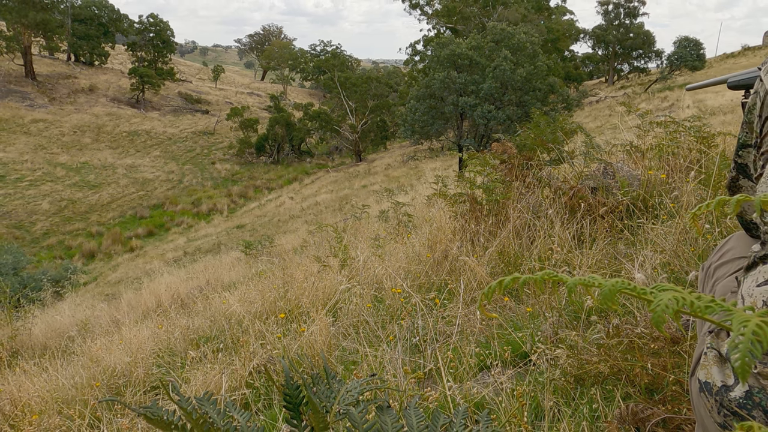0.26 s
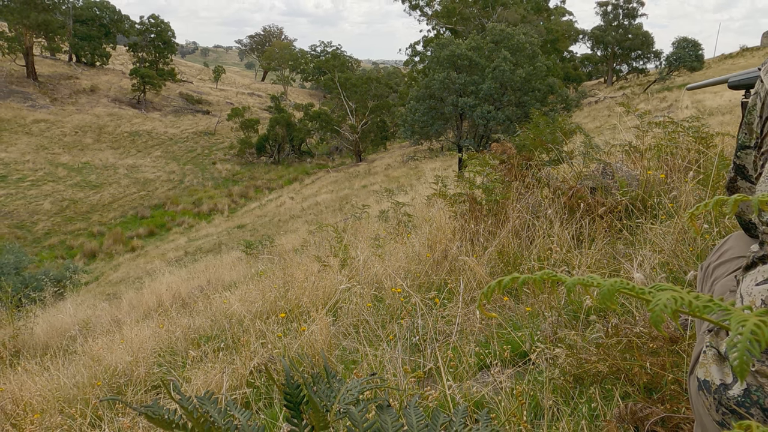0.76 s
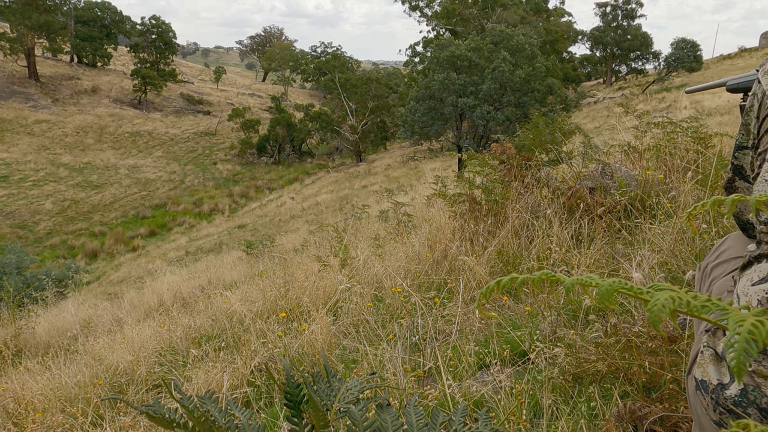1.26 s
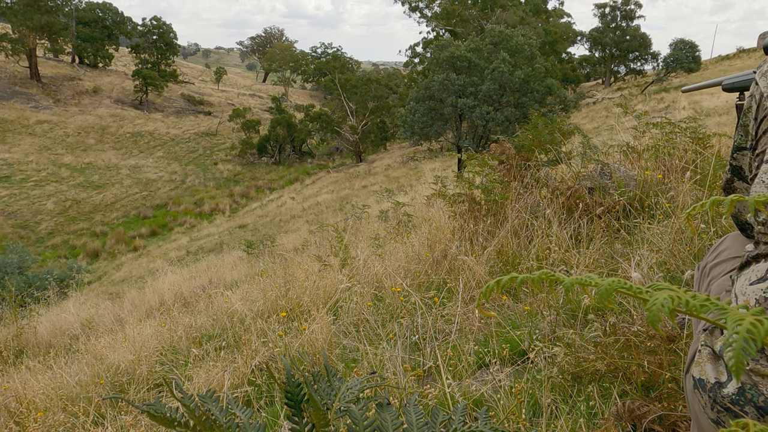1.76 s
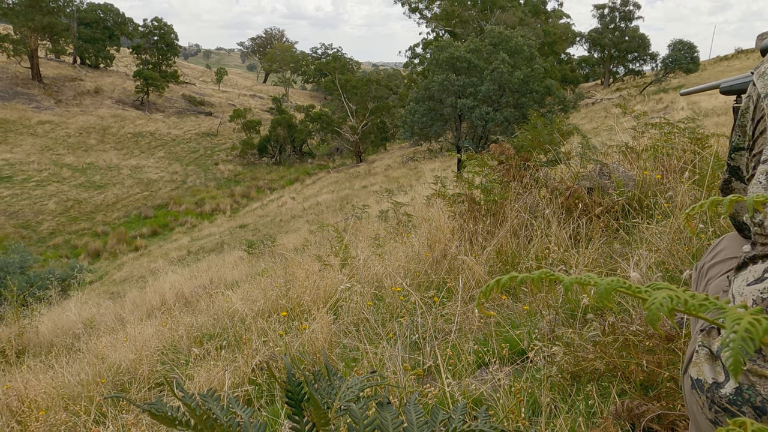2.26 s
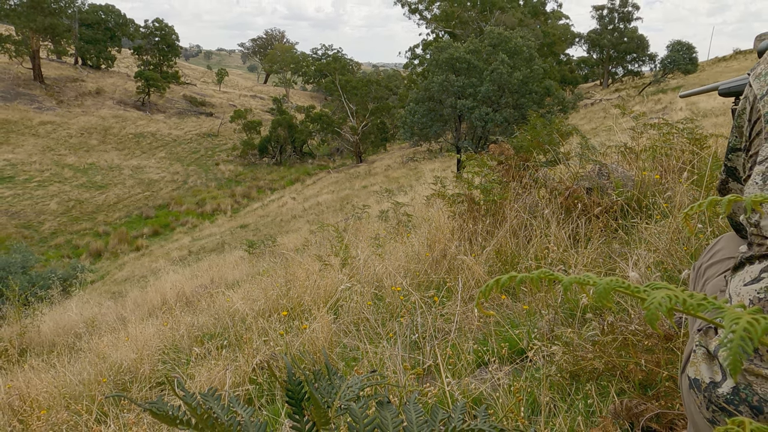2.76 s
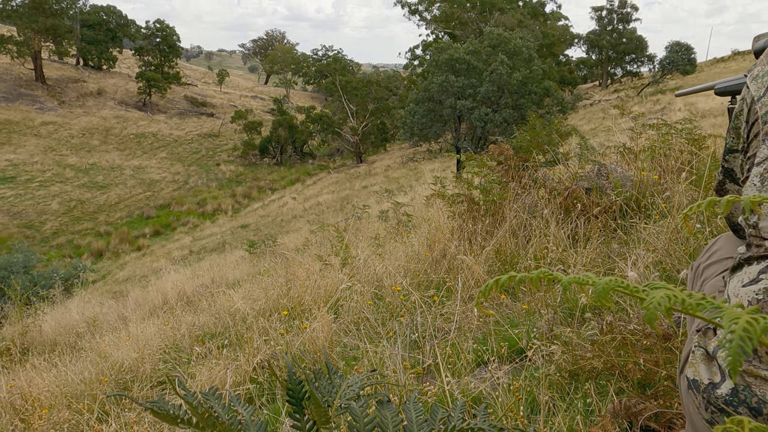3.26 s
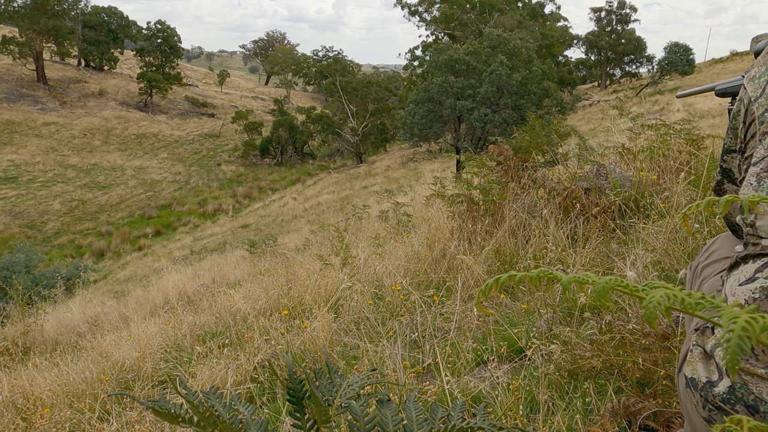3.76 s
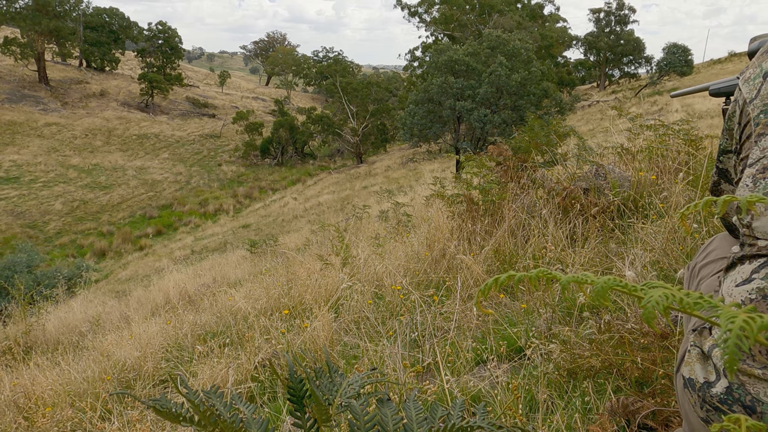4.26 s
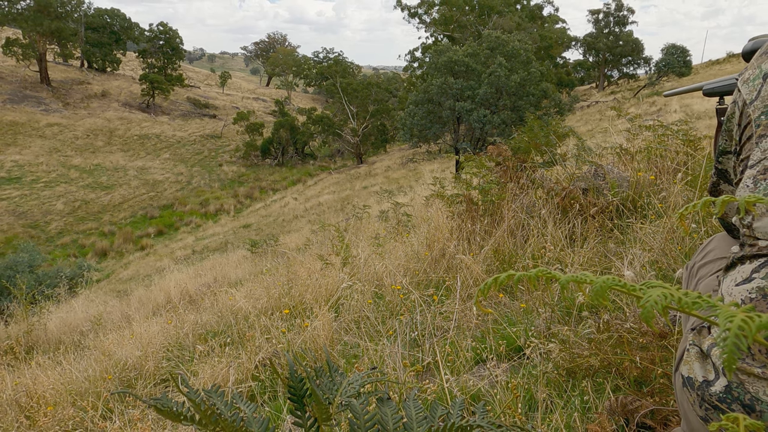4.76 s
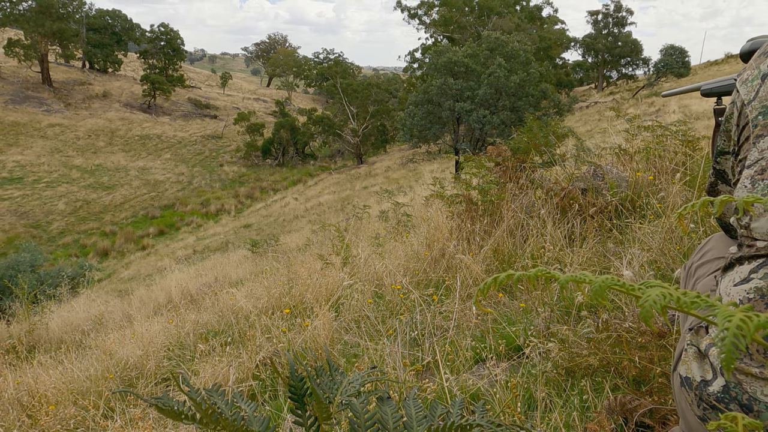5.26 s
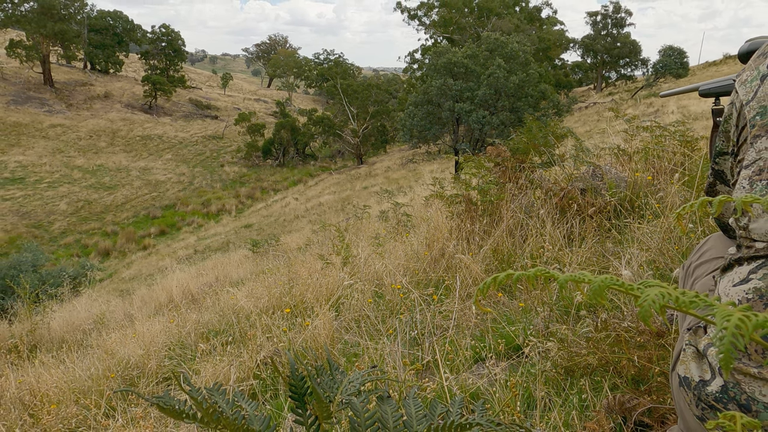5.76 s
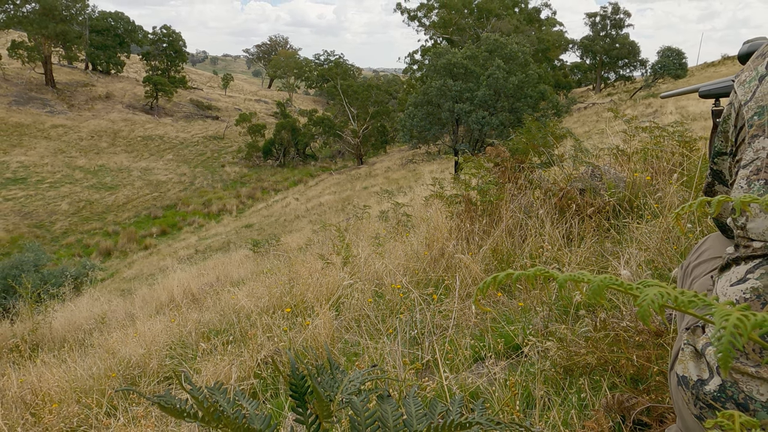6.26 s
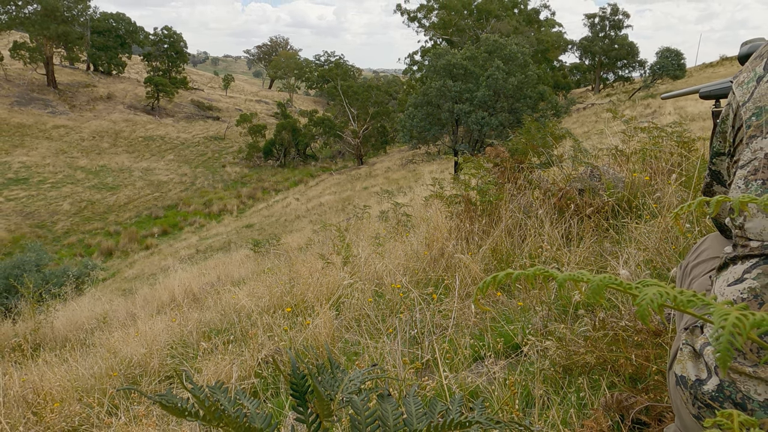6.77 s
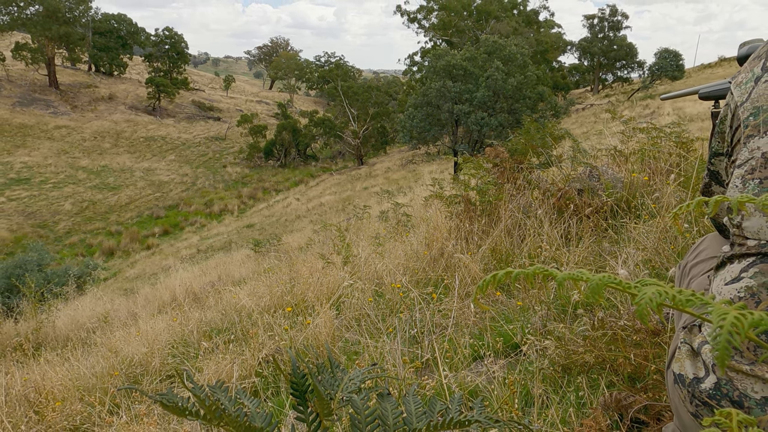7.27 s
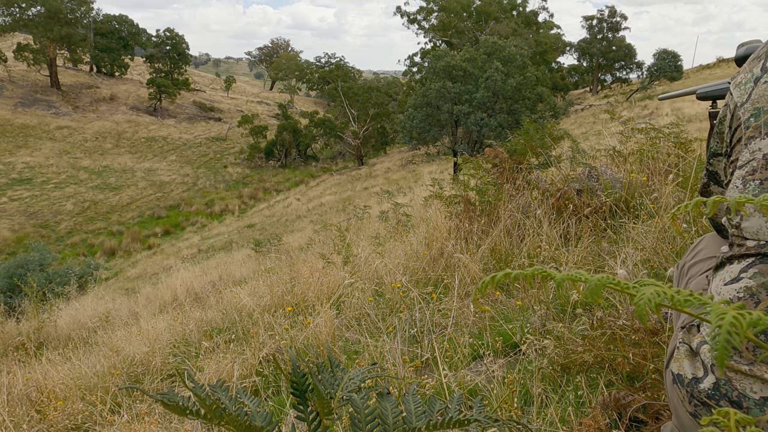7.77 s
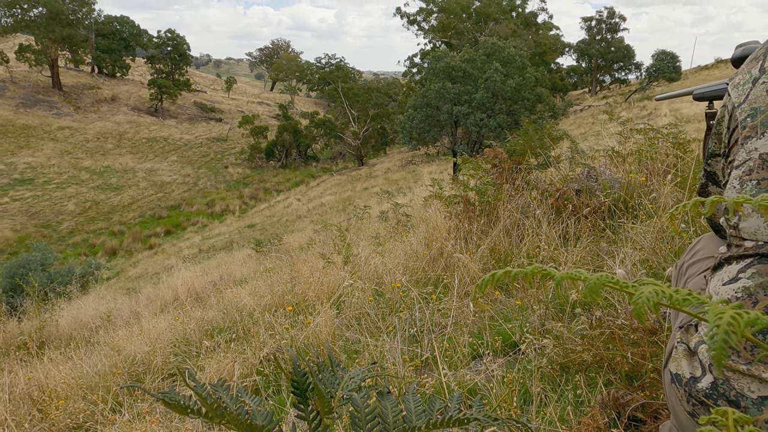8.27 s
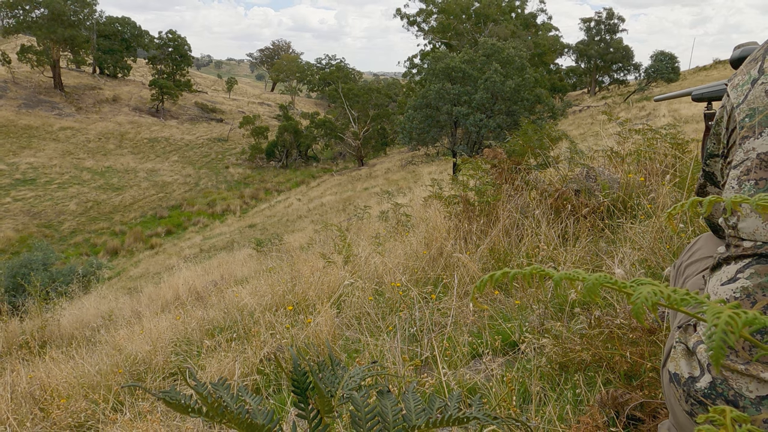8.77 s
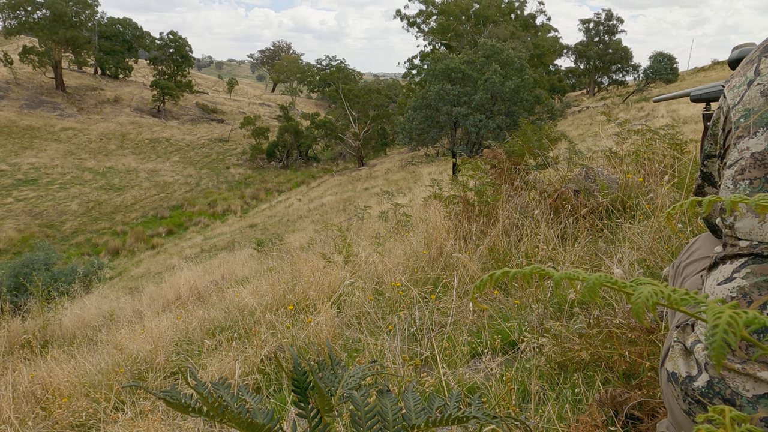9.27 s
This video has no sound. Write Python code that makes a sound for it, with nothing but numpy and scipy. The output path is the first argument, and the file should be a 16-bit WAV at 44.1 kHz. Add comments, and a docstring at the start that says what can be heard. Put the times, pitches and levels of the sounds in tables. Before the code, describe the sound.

One loud reed predator-call squeal cracks up and breaks down close by, while a harsh bird screeches three times across an insect-filled grassy gully.

```python
"""Insect hiss and far wind lie over a grassy hillside, where three small singers trill and dry stalks tick.
Soon a small reed call is blown once beside the microphone: a squeal that cracks upward and breaks down.
A harsh bird screeches three times across the gully. Wind and insects are shaped random spectra, trills are
falling sine notes, the bird is a pulse series coloured by a throat, and the reed is a stack of partials
with pulsed air and beating side tones; scattered echoes follow the bird and the reed."""
import sys
import numpy as np
from scipy import signal
from scipy.fft import rfft, irfft
from scipy.io import wavfile
from scipy.ndimage import uniform_filter1d

SR = 44100
rng = np.random.default_rng(int(sys.argv[2]) if len(sys.argv) > 2 else 0)


def transcribe(signal):
    """Save signal, clipped to [-1, 1], as a 16-bit WAV file at the path in sys.argv[1]."""
    frames = np.atleast_2d(signal).T
    limited = np.clip(frames, -1, 1)
    pcm = np.round(limited * 32767).astype(np.int16)
    wavfile.write(sys.argv[1], SR, pcm)


N = 419391

# Spectrum of air rushing past the reed. Each row: frequency in Hz, level in dB.
AIR_SPECTRUM = [(300, -38.5), (900, -17), (2500, -8), (5000, -4.5), (8000, 0.5), (9000, -15.5),
                (10500, -6.5), (12000, -17), (15000, -41.5)]


def gain_of(db):
    """Decibels express an amplitude ratio on a logarithmic scale."""
    return 10 ** (np.asarray(db) / 20)


def evened(x):
    """Dividing a signal by its root mean square gives it unit power."""
    return x / np.sqrt(np.mean(x ** 2) + 1e-20)


def level_at(points, hz):
    """A spectral envelope is read along a logarithmic frequency axis."""
    point_hz, level_db = np.transpose(points)
    return np.interp(np.log(hz + 1), np.log(point_hz + 1), level_db)


def curves(rows):
    """Slowly varying parameters are joined by straight lines; returns sample times and the columns."""
    row_s, *columns = np.transpose(rows)
    row_s = np.maximum.accumulate(row_s)
    t = np.arange(round(row_s[0] * SR), round(row_s[-1] * SR)) / SR
    return t, [np.interp(t, row_s, column) for column in columns]


def add(mix, start, sound):
    """Sounds superpose: their pressures add from the start time in seconds."""
    part = mix[round(start * SR):][:len(sound)]
    part += sound[:len(part)]


def coloured(x, points):
    """A linear filter multiplies the spectrum by a gain at each frequency."""
    response = gain_of(level_at(points, np.fft.rfftfreq(len(x), 1 / SR)))
    return irfft(rfft(x) * response, len(x))


def without_bass(x, order, hz):
    """A short or small resonator radiates little below its cutoff, as a high-pass filter does."""
    return signal.sosfilt(signal.butter(order, hz, "high", fs=SR, output="sos"), x)


def wander(size, hz):
    """Low-pass filtered noise of unit rms fluctuates smoothly, up to about hz times a second."""
    smoother = signal.butter(2, hz, fs=SR, output="sos")
    return evened(signal.sosfilt(smoother, rng.standard_normal(size)))


def tone(turns):
    """A sinusoid of unit rms follows its phase, counted in turns."""
    return np.sqrt(2) * np.sin(2 * np.pi * turns)


def field():
    """Far wind and insects are random short-time spectra; partly independent sides widen the image."""
    # Far wind. Each row: frequency in Hz, relative level in dB per Hz.
    wind = [(15, -54.5), (25, -24.5), (97, -22), (124, -22), (160, -4), (311, -5), (579, -0.5), (835, -4.5),
            (936, -5.5), (1320, -6), (3970, -12), (6000, -20), (7800, -47), (13200, -120)]
    # Insect hiss. Each row: frequency in Hz, relative level in dB per Hz.
    insects = [(4500, -41), (6000, -14.5), (6800, -11.5), (7600, -2.5), (8200, 1.5), (8850, -4.5),
               (9050, -17), (10000, -22), (11500, -26), (12500, -40), (13000, -51)]
    # Stereo spread. Each row: frequency in Hz, level of side against mid in dB.
    side_levels = [(60, -17), (180, -39), (540, -43.5), (1640, -33.5), (4950, -29), (14900, -23)]
    field_db, insects_db = -62.5, -7  # rms of the mid; insects against the wind
    gust_db, gust_s, gust_hz = 6.5, 2, 399.8  # the low wind is stronger at first and drops

    frames, hz = N // 256 + 5, np.fft.rfftfreq(1024, 1 / SR)
    mid_re, mid_im, side_re, side_im, patches = rng.standard_normal((frames, 513, 5)).T
    side_gain = gain_of(level_at(side_levels, hz))[:, None]
    spectra = np.array([mid_re + 1j * mid_im, side_gain * (side_re + 1j * side_im)])

    wind_gain = gain_of(level_at(wind, hz))
    insect_gain = gain_of(level_at(insects, hz) + insects_db)
    spectra *= np.hypot(wind_gain, insect_gain)[:, None]

    # soft patches: smoothed over 10 frequency bins and 12 frames
    patches = evened(uniform_filter1d(uniform_filter1d(patches, 10, 0), 12, 1))
    swell = wander(N + 2048, 0.59)[::256][:frames]
    spectra *= gain_of(0.89 * patches + 0.32 * swell)

    gust_by_hz = 1 / (1 + (hz / gust_hz) ** 2)
    gust_by_time = 1 / (1 + (np.arange(frames) * 256 / SR / gust_s) ** 4)
    spectra *= gain_of(gust_db * np.outer(gust_by_hz, gust_by_time))

    mid, side = signal.istft(spectra, nperseg=1024, noverlap=768)[1][:, :N]
    return gain_of(field_db) * np.array([mid + side, mid - side]) / np.std(mid)


def stalks():
    """A snap is a rapidly damped oscillation; a brush is a dense run of unequal impulses."""
    # Snaps. Each row: start in seconds, peak level in dB, frequency in Hz.
    ticks = [(1.594, -49, 9000), (2.004, -52, 9500), (6.49, -50, 7000), (8.035, -54, 6000),
             (8.188, -48, 7000), (8.197, -48, 6500), (8.527, -43, 5500), (8.9, -45, 4300),
             (9.255, -52, 9000)]
    # Longer brushes. Each row: start in seconds, length in seconds, level before the fades in dB.
    brushes = [(.275, 0.038, -58), (8.115, 0.046, -60.5)]
    brush_spectrum = [(2000, -22), (3500, 7), (6500, 4), (11500, -12), (13000, -40)]  # (Hz, dB)

    out, t = np.zeros(N), np.arange(200) / SR
    for start, db, hz in ticks:
        decay = gain_of(db - 60 * t / .0018)  # 60 dB in 1.8 ms
        add(out, start, decay * np.cos(2 * np.pi * hz * t))
    for start, length, db in brushes:
        size = round(length * SR)
        crackle = rng.standard_normal(size) * gain_of(4.2 * rng.exponential(1, size))
        brush = evened(coloured(crackle, brush_spectrum))
        add(out, start, gain_of(db) * brush * np.hanning(size))
    return out


def trills(rows, swell_db, fall_hz, length):
    """A trill repeats a short falling whistle; small chance offsets vary its pitch and strength."""
    out, u = np.zeros(N), np.linspace(0, 1, round(length * SR))
    for first, last, spacing, last_db, top_hz in rows:
        count = round((last - first) / spacing) + 1
        centres = np.linspace(first, last, count)
        levels_db = np.linspace(last_db - swell_db, last_db, count)
        chances = rng.standard_normal((count, 2))
        for centre, db, (pitch_chance, level_chance) in zip(centres, levels_db, chances):
            hz = (top_hz - fall_hz * u) * (1 + .005 * pitch_chance)
            hz *= 1 + .004 * wander(len(u), 300)  # a slight burr
            note = tone(np.cumsum(hz) / SR) * np.sin(np.pi * u)
            add(out, max(centre - length / 2, 0), gain_of(db + 1.5 * level_chance) * note)
    return out


def singers():
    """Three singers occupy separate frequency bands, so their trills remain distinct."""
    # Low singer. Each row: first and last note in seconds, spacing in seconds, nominal level of
    # the last note in dB, nominal top of each note in Hz.
    low_rows = [(.004, .342, .029, -63.5, 4150), (1.15, 2.139, .030, -65.5, 4150),
                (2.318, 2.574, .051, -63.5, 4150), (3.04, 3.35, .030, -68, 4120),
                (3.5, 3.63, .032, -68.5, 4200), (3.81, 4.108, .049, -64.5, 4175),
                (4.155, 4.268, .028, -66, 4110), (4.49, 4.8, .0282, -69.5, 4120),
                (4.86, 5.085, .056, -70, 4150), (5.14, 5.32, .06, -72, 3850),
                (5.57, 5.91, .0567, -68.5, 3840), (6.43, 7.236, .0287, -63, 4140),
                (8.14, 8.674, .0534, -61.5, 4075), (9.259, 9.468, .052, -63.5, 4160)]
    # Middle singer. Each row: first and last note in seconds, nominal level of the last note in dB.
    mid_rows = [(.069, 0.334, -66), (1.796, 2.081, -67.5), (2.576, 2.898, -68.5), (3.357, 3.676, -69),
                (4.177, 4.507, -67), (5.105, 5.378, -68), (5.835, 6.11, -67.5), (6.746, 7.072, -67.5),
                (7.612, 7.932, -67.5), (8.437, 8.703, -67), (9.294, 9.477, -68)]
    # High singer. Each row: first and last note in seconds, nominal level of the last note in dB.
    high_rows = [(0.274, 0.35, -75), (1.152, 1.359, -76), (1.39, 1.99, -73.5), (2.104, 2.458, -77.5),
                 (2.535, 2.694, -79), (2.812, 3.011, -76), (3.287, 3.561, -76), (3.814, 4.076, -76),
                 (4.314, 4.549, -76), (4.648, 5.135, -77.5), (5.329, 5.605, -74.5), (5.834, 6.111, -73.5),
                 (6.256, 6.536, -78), (6.923, 7.155, -78), (7.425, 7.85, -77), (7.97, 8.166, -74.5),
                 (8.352, 8.666, -78.5), (8.976, 9.215, -79)]
    mid_spacing_s, mid_top_hz = .046, 7250
    high_spacing_s, high_top_hz = .039, 9750

    mid_rows = [(first, last, mid_spacing_s, db, mid_top_hz) for first, last, db in mid_rows]
    high_rows = [(first, last, high_spacing_s, db, high_top_hz) for first, last, db in high_rows]
    out = trills(low_rows, swell_db=4.5, fall_hz=560, length=.03)
    out += trills(mid_rows, swell_db=5.5, fall_hz=800, length=.017)
    out += trills(high_rows, swell_db=3, fall_hz=250, length=.015)
    return out


def gully(x, t60, gap):
    """Scattering from trees and the far slope: randomly signed, dull echoes that decay exponentially."""
    at = np.arange(round(gap * SR), 2 * SR - 20, 20)
    taps = np.zeros(2 * SR)
    tap_at = at + rng.integers(0, 20, len(at))
    taps[tap_at] = rng.choice([-1., 1.], len(at)) * gain_of(-60 * at / SR / t60)
    taps = coloured(taps, [(300, 2.5), (2500, -7.5), (5000, -5.5), (10000, -18.0)])
    return signal.fftconvolve(x, taps / np.linalg.norm(taps))[:N]


def screech(row, throat):
    """Source and filter: pulses near 400 a second fray into rough partials and half partials."""
    # Clearer stretches of the voice. Each row: start and end in seconds, roughness from 0 to 1.
    clearer = [(1.5, 1.63, .65), (2.88, 3.0, .62), (3.0, 3.2, .06), (3.2, 3.225, .55), (6.22, 6.39, .65),
               (6.39, 6.495, .2), (6.495, 6.6, .7)]
    # A brief dip of the voice as the squeal ends: centre and half width in seconds, change in dB.
    dip = (1.14, 0.13, -5)
    # Throat in the clear stretches. Each row: frequency in Hz, level in dB.
    clear_throat = [(820, -56.5), (1400, -26), (2010, -9), (2210, -7), (2450, 0.5), (2620, -13), (2870, -2),
                    (3390, -23.5), (4090, -15.5), (4760, -24), (5000, -29), (6000, -36.5), (7800, -69),
                    (13200, -120)]
    usual_roughness = .87  # 0 to 1
    attack_share = .25  # the fade-in takes this share of the swell
    release_s, lift_s, third_fade_db = 0.045, 0.024, -5  # fade-out; closing push and its loss of third
    (start, end, onset_db, swell, top_db, sag_db, push_db, third_db,
     first_hz, settled_hz, settle, lift_hz) = row

    t = np.arange(start, end, 1 / SR)
    size = len(t)
    effort_s = [start, start + swell, start + swell + 0.064, end]
    effort_db = np.interp(t, effort_s, [onset_db, 0, sag_db, sag_db])
    dip_s, dip_half_width, dip_db = dip
    effort_db += dip_db * np.clip(1 - abs(t - dip_s) / dip_half_width, 0, 1)
    closing = np.clip(1 + (t - end + release_s) / lift_s, 0, 1)
    voice_db = top_db + effort_db + push_db * closing
    third_db = third_db + effort_db + third_fade_db * closing

    rough = np.full(size, usual_roughness)
    for a, b, value in clearer:
        rough[(t > a) & (t < b)] = value
    rough = uniform_filter1d(rough, size=900)

    hz = settled_hz + (first_hz - settled_hz) * np.exp((start - t) / settle) + lift_hz * closing
    turns = np.cumsum(hz * (1 + 0.003 * wander(size, 60))) / SR

    clear = sum(gain_of(3.5 * wander(size, 9)) * tone(k * turns + rng.random()) for k in range(4, 15))
    clear = evened(coloured(clear, clear_throat))
    # alternating strong and weak strokes give partials at half multiples
    frayed = sum(wander(size, 45) * tone(k * turns / 2 + rng.random()) for k in range(5, 33))
    puffs = (.5 + np.exp(-(turns % 1) / 0.4)) * rng.standard_normal(size)
    harsh = evened(coloured(evened(frayed) + 1.2 * evened(puffs), throat))
    harsh *= gain_of(.6 * wander(size, 30))
    voice = ((1 - rough) * clear + rough * harsh) / np.hypot(rough, 1 - rough)

    # the third partial sings through even when the voice is rough
    third = tone(3 * turns + .06 * rough * wander(size, 50))
    third *= 1 + .45 * rough * wander(size, 50)
    edges = np.clip(np.minimum((t - start) / (attack_share * swell), (end - t) / release_s), 0, 1)
    return start, (gain_of(voice_db) * voice + gain_of(third_db) * third) * edges ** 2


def bird():
    """Each screech has its own throat resonances; the small throat gives little bass."""
    # Each row: start and end in seconds, onset in dB against the top, swell in seconds, top level in dB,
    # sag in dB, closing push in dB, third partial in dB, first pulse rate in Hz, settled pulse rate
    # in Hz, settling time constant in seconds, closing lift in Hz.
    screeches = [(0.572, 1.668, -10, 0.24, -44, -1, 3, -55.5, 350.5, 408.2, .3, 12),
                 (2.534, 3.26, -5, 0.33, -49, -1, 3, -57.5, 335.6, 405.8, .13, 12.7),
                 (5.93, 6.669, -13.5, 0.43, -46, -3, 2, -64.5, 361.3, 395.3, 0.22, 15.6)]
    # One throat spectrum per screech. Each row of a spectrum: frequency in Hz, level in dB.
    throats = [
        [(820, -38.5), (1400, -11), (1940, -18.5), (2210, -6.5), (2530, -1), (2710, -2), (2930, -14.5),
         (3250, -6), (3650, -16.5), (4960, -19.5), (5720, -30), (6500, -36.5), (8450, -66.5), (14300, -120)],
        [(820, -18.5), (1400, -11.5), (1690, -18), (1860, -7.5), (2150, -0.5), (2430, -6), (2640, -1.5),
         (3050, -8), (3890, -7.5), (4710, -18), (5870, -39), (6500, -32), (8450, -59), (14300, -120)],
        [(820, -28), (1400, -11.5), (1710, -20), (1860, -14), (2180, -8.5), (2250, -4.5), (2580, 0.5),
         (2870, -11), (3190, -6), (3510, -11.5), (4340, -11.5), (4650, -21), (5540, -26), (6500, -36),
         (8450, -65), (14300, -120)],
    ]

    out = np.zeros(N)
    for row, throat in zip(screeches, throats):
        add(out, *screech(row, throat))
    return without_bass(out, order=4, hz=800)


def unsteadiness(t):
    """Reed instability modulates frequency and amplitude: returns pitch shake and rasp, as shares."""
    # Unsteady spells. Each row: start, worst moment and end in seconds, flutter as a share of pitch,
    # rasp as a share of strength.
    spell_rows = [(.37, .376, .39, .002, .35), (.375, .461, .47, .029, .27), (.585, .609, .66, .02, .22),
                  (.64, .68, .7, .003, .07), (.79, .838, .844, .002, .08), (1.0, 1.008, 1.045, .009, .3),
                  (1.01, 1.055, 1.2, .005, .18)]
    calm_flutter, calm_rasp = .001, .03  # shares in the steady reed
    flap_hz = 46  # the lips flap; pitch flicks highest at the worst moment of a spell

    spells = np.array([np.interp(t, row[:3], [0, 1, 0]) for row in spell_rows])
    flutter, rasp = np.transpose(spell_rows)[3:] @ spells + [[calm_flutter], [calm_rasp]]
    flaps = sum(depth * spell * np.cos(2 * np.pi * flap_hz * (t - worst))
                for (_, worst, _, depth, _), spell in zip(spell_rows, spells))
    shake = np.sqrt(2) * flaps + .3 * flutter * wander(len(t), 150)
    return shake, rasp


def reed_partial(k, turns, shake, rasp):
    """Amplitude modulation: a partial is louder as pitch flicks up and drops out briefly in rasp."""
    size = len(turns)
    ragged = 1 + rasp * wander(size, 300)
    throb = gain_of(60 * shake - 22 * rasp * abs(wander(size, 60)))
    return tone(k * turns + 0.35 * k) * ragged * throb


def reed_air(turns, t):
    """Turbulence noise is modulated once each cycle by the opening of the reed."""
    pulsed = rng.standard_normal(len(t)) * (1 + .5 * tone(turns))
    return evened(coloured(pulsed, AIR_SPECTRUM)) * np.clip((t[-1] - t) / .04, 0, 1)


def add_weak_vibrations(sound, t, turns):
    """Intermodulation: two weaker vibrations mix with the reed into sum and difference tones."""
    # Vibrations after the crack, near the old pitch and lower. Each row: time in seconds,
    # nominal frequency in Hz, level in dB.
    old_note = [(.836, 1640, -22), (.85, 1615, -37), (.88, 1620, -53), (.96, 1710, -51.5),
                (1.006, 1760, -39.5)]
    low_note = [(.865, 1132, -52.5), (.89, 1106, -44), (.93, 1116, -41.5), (.97, 1113, -49.5),
                (1.0, 1100, -50.5)]
    # Their mixed tones. Each row: multiple of the reed, multiple of the weak vibration,
    # level in dB against that vibration.
    old_mix = [(0, 1, -3), (1, -1, -22), (1, 1, 0), (2, 1, 1), (3, 1, -4)]
    low_mix = [(0, 1, -8), (1, 1, -1), (2, 1, 0), (3, -1, 0), (0, 2, -4), (1, 2, 3), (4, -1, -5),
               (3, 1, -3)]

    for note, mix in ((old_note, old_mix), (low_note, low_mix)):
        u, (weak_hz, db) = curves(note)
        reed = np.interp(u, t, turns)
        weak = np.cumsum(weak_hz * (1 + .0025 * wander(len(u), 200))) / SR
        beats = sum(gain_of(mix_db + 5.1 * wander(len(u), 55)) * tone(round(k) * reed + round(m) * weak)
                    for k, m, mix_db in mix)
        add(sound, u[0] - t[0], gain_of(db) * beats * signal.windows.tukey(len(u), .08))


def add_air_bursts(out):
    """Transient turbulence decays exponentially as the reed catches or jumps."""
    # Each row: start in seconds, initial level in dB, time to fall 60 dB in seconds.
    bursts = [(.377, -35.5, 0.023), (.4625, -32.5, 0.018), (.836, -21, .02), (1.006, -30, .03)]
    u = np.arange(1500) / SR
    for start, db, t60 in bursts:
        burst = evened(coloured(rng.standard_normal(len(u)), AIR_SPECTRUM))
        add(out, start, gain_of(db - 60 * u / t60) * burst)


def squeal():
    """A beating reed yields three strong partials and a bright harmonic stack coloured by the barrel."""
    # The blow. Each row: time in seconds, pitch in Hz, fundamental in dB, second and third partial
    # in dB, higher partials together in dB; all are nominal, before colour and unsteadiness.
    reed = [(.374, 984, -53.5, -34.5, -38.5), (.389, 1034, -38.5, -29.5, -27.5),
            (.457, 1164, -35, -22.5, -21), (.47, 1242, -49.5, -23, -25), (.53, 1360, -41, -19, -24),
            (.578, 1465, -38.5, -21.5, -20.5), (.604, 1591, -25.5, -19.5, -26.5),
            (.625, 1578, -30, -24, -27), (.662, 1622, -20, -22.5, -29.5), (.68, 1611, -23.5, -27.5, -23.5),
            (.718, 1622, -30.5, -23.5, -28), (.78, 1639, -36, -22, -25.5), (.826, 1690, -40, -20, -22.5),
            (.838, 1703, -42.5, -23.5, -23.5), (.838, 2064, -19, -19.5, -48.5),
            (.868, 2095, -18.5, -18, -37.5), (.902, 2040, -17.5, -25, -47), (.968, 2020, -17, -26.5, -48.5),
            (1.006, 1923, -20, -47.5, -41), (1.006, 1410, -32.5, -19, -22.5),
            (1.046, 1192, -45.5, -23.5, -28.5), (1.052, 1088, -35, -23.5, -28.5),
            (1.068, 1057, -37.5, -34.5, -23.5), (1.094, 998, -56, -26.5, -36.5),
            (1.115, 938, -71, -64, -46)]
    # Colour of the second and third partial. Each row: frequency in Hz, level in dB.
    bell = [(1900, 3.5), (2300, -5.5), (2500, -2.5), (2640, -17), (2780, -4), (2940, -17.5), (3180, -1.5),
            (3380, 5), (3700, -6), (4050, 0), (4400, -5.5), (4700, -5), (4900, -0.5), (6200, -3)]
    # Colour of the higher partials. Each row: frequency in Hz, relative level in dB.
    barrel = [(2060, -43), (3500, -13), (4000, -1), (4590, -6.5), (4840, -8.5), (5360, -12), (6420, -6.5),
              (6960, -0.5), (8160, -8), (8980, -31.5), (9840, -17), (10900, -25), (11500, -23.5),
              (12500, -39), (16200, -71), (22000, -120)]
    overblown_hz, thin_third_db = 1800, -14.5  # above that pitch the third partial thins out
    # the second and third partials dip at random, most deeply while the pitch glides this fast
    dip_depth_db, glide_hz_per_s = 3, 1500
    # air at 1 kHz without rasp, then its rise with rasp and pitch
    air_base_db, air_per_rasp_db, air_per_octave_db = -54.5, 25.5, 13.5

    t, columns = curves(reed)
    size = len(t)
    thin = (columns[0] > overblown_hz) * 1.
    # the reed needs a few cycles to change
    hz, db1, over_db, high_db, thin = uniform_filter1d(columns + [thin], size=130, axis=1)
    glide = np.clip(abs(np.gradient(hz)) * SR / glide_hz_per_s, 0, 1)
    dips_db = dip_depth_db * (1 - thin) * glide
    db2, db3 = [over_db + level_at(bell, k * hz) - dips_db * wander(size, 25) ** 2 for k in (2, 3)]
    db3 = db3 + thin_third_db * thin

    shake, rasp = unsteadiness(t)
    turns = np.cumsum(hz * (1 + shake + 0.0003 * wander(size, 400))) / SR
    low = sum(gain_of(db) * reed_partial(k, turns, shake, rasp)
              for k, db in enumerate((db1, db2, db3), 1))
    heights = [gain_of(level_at(barrel, k * hz) + 3.2 * wander(size, 36)) for k in range(4, 13)]
    high = sum(height * reed_partial(k, turns, shake, rasp) for k, height in enumerate(heights, 4))
    high /= np.linalg.norm(heights, axis=0)
    air_db = air_base_db + air_per_rasp_db * rasp + air_per_octave_db * np.log2(hz / 1000)
    sound = low + gain_of(high_db) * high + gain_of(air_db) * reed_air(turns, t)
    add_weak_vibrations(sound, t, turns)

    out = np.zeros(N)
    add(out, t[0], sound * signal.windows.tukey(size, .012))
    add_air_bursts(out)
    return without_bass(out, order=2, hz=500)  # the short barrel gives little bass


def scene():
    """Superposition of the field, stalks, singers, bird and reed, with echoes of the last two."""
    background = field() + stalks() + singers()
    voice = bird()
    voice += gain_of(-15.5) * gully(voice, t60=2.0, gap=0.044)
    call = squeal()
    near = gain_of(-29) * gully(call, t60=0.32, gap=0.0013)
    far = gain_of(-45.5) * gully(call, t60=2.9, gap=0.06)
    return background + voice + call + near + far


def record(dry):
    """Spectral folding: the converter leaves a faint treble mirror about 12 kHz; then a band limit."""
    mirror_hz, edge_hz = 24000, 15400  # a component at f folds to mirror_hz - f
    direct_colour = [(11300, 1), (12300, -24.0)]  # (Hz, dB)
    mirror_colour = [(11500, -63.5), (12200, -7), (14000, -19), (15400, -30.0), (16000, -89.5)]
    carrier = np.exp(2j * np.pi * mirror_hz * np.arange(N) / SR)
    mirror = (np.conj(signal.hilbert(dry)) * carrier).real
    folded = [coloured(direct, direct_colour) + coloured(image, mirror_colour)
              for direct, image in zip(dry, mirror)]
    band_limit = signal.firwin(511, edge_hz, window=("kaiser", 9), fs=SR)
    return signal.oaconvolve(folded, band_limit[None], "same")


dry = scene()
out = record(dry)
transcribe(out)
```